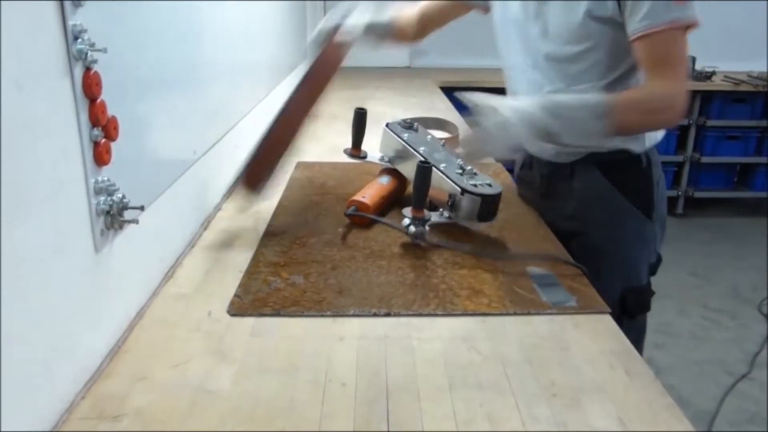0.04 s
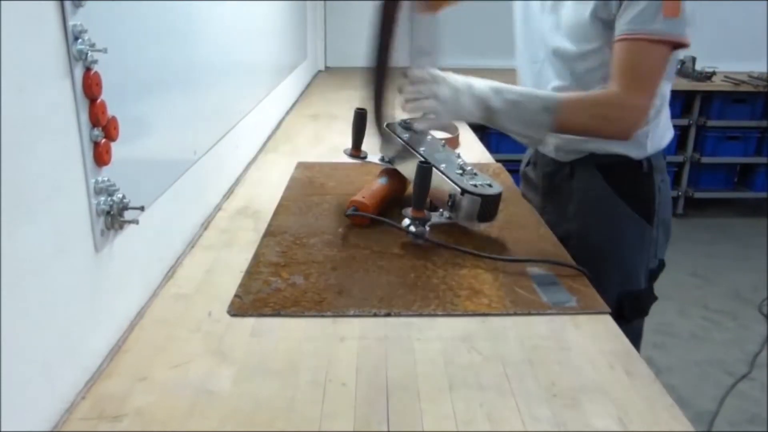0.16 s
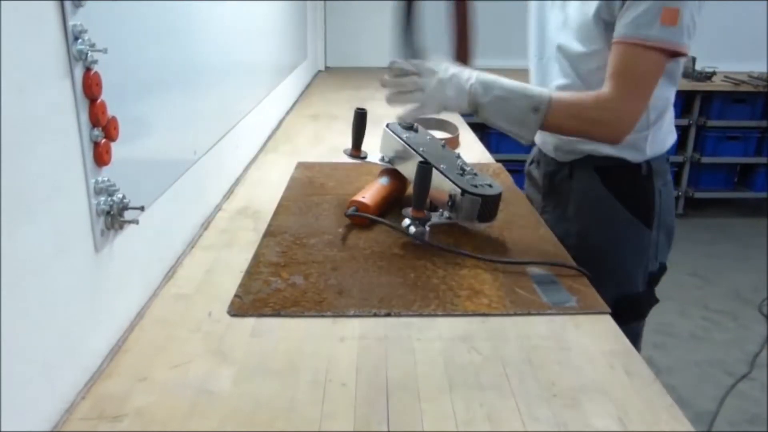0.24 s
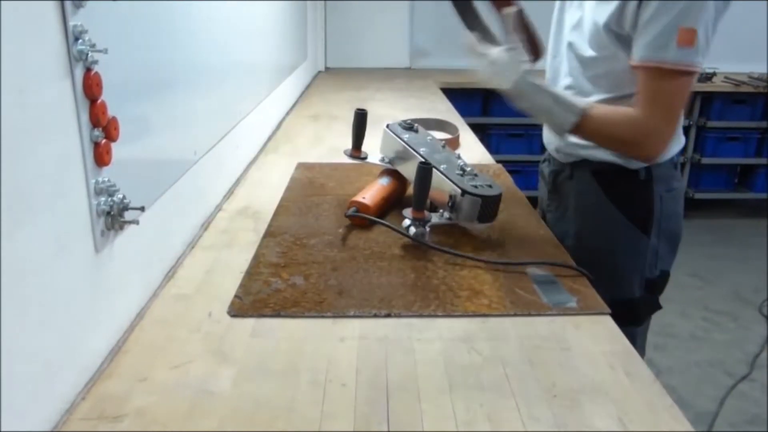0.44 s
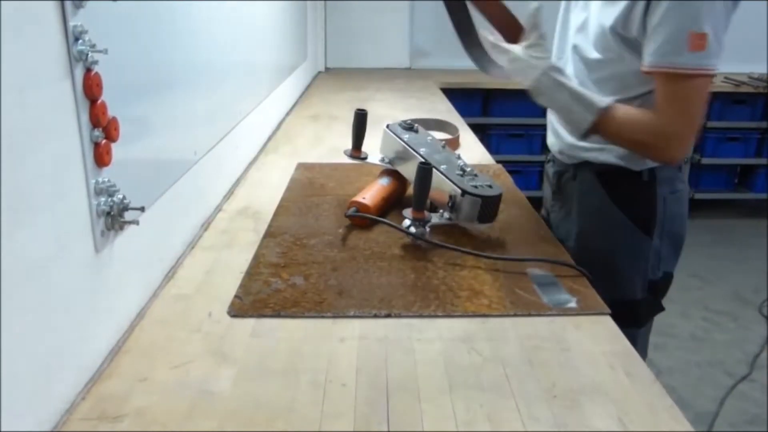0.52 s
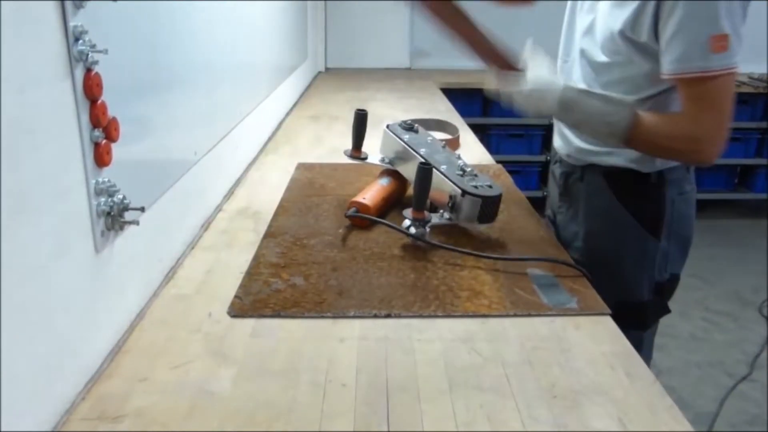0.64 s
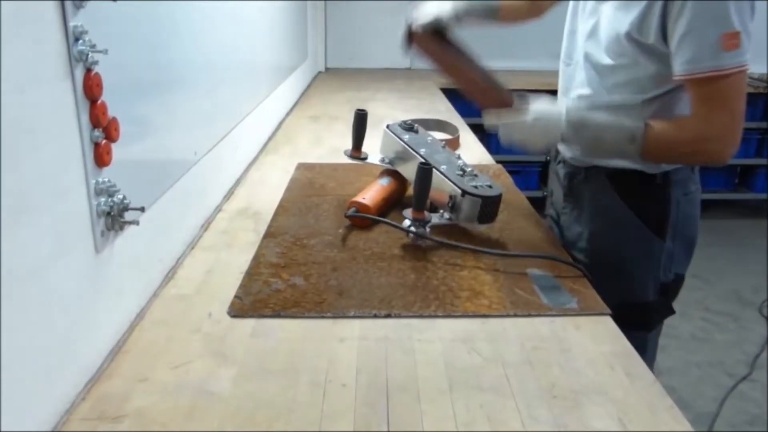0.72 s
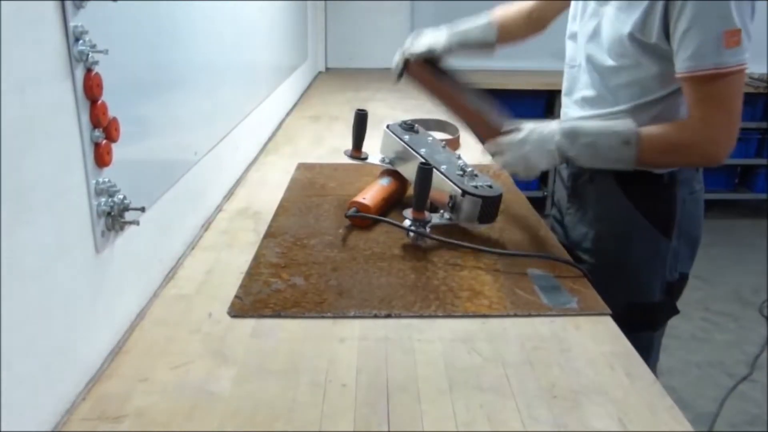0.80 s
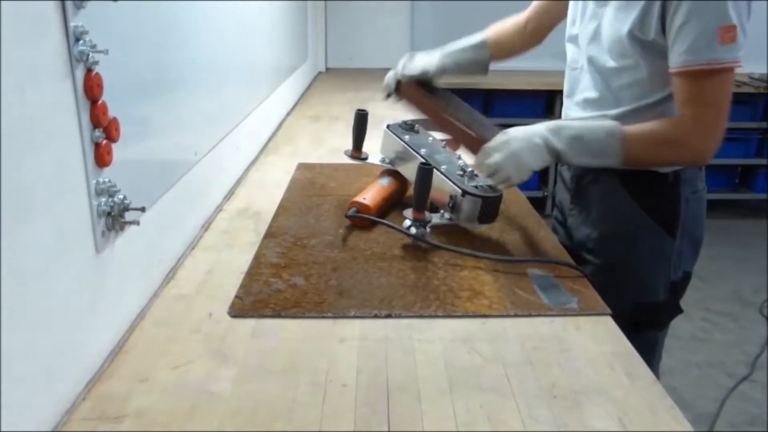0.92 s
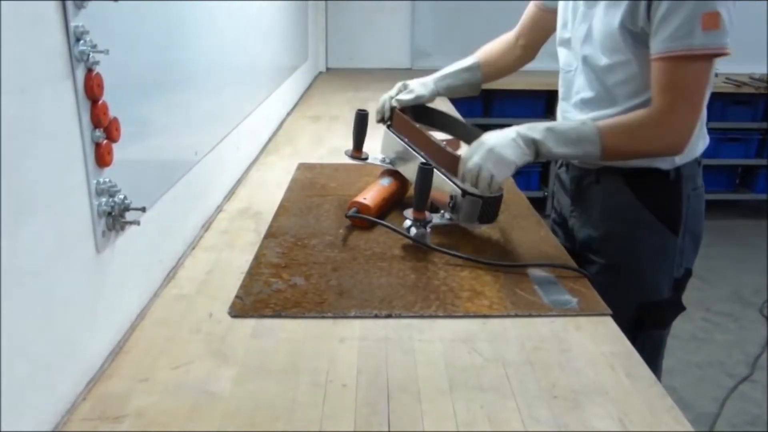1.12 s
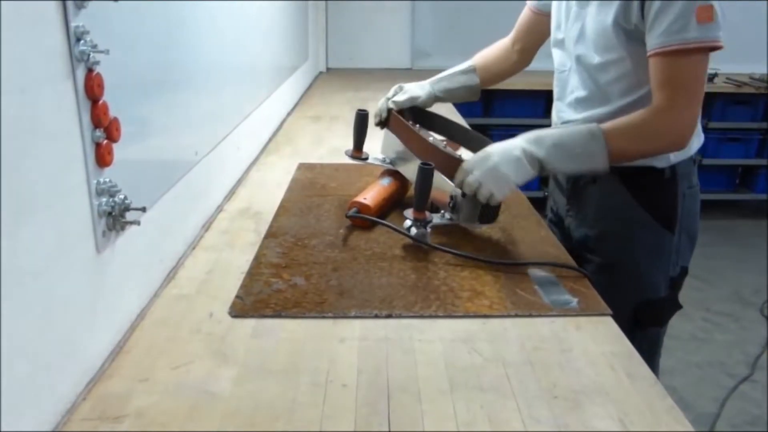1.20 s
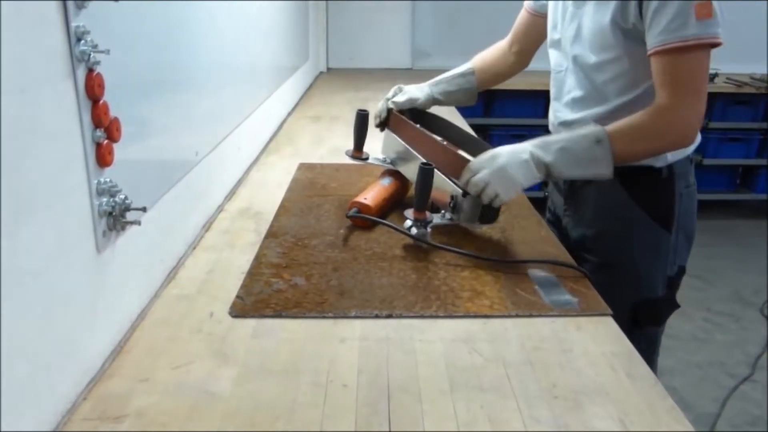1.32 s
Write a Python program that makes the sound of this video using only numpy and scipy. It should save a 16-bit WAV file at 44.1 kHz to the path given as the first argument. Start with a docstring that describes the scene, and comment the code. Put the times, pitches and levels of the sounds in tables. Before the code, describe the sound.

In a quiet workshop, a nearby belt sander gives one bright metallic clack and rocks briefly on the bench. Faint grainy rustles of gloves on a sanding belt follow, then a quick cluster of dull knocks and scrapes.

```python
"""A workshop, where a sanding belt is being fitted to a steel belt sander on a wooden bench.
The belt swishes through the air, then the tension arm snaps back: steel hits steel with a ringing clack,
the bench booms and the machine rocks on its feet. Gloves rustle on the belt in grainy strokes of friction,
and the stiff loop knocks down onto the rollers. A short room tail and still air lie behind it all."""
import sys
import numpy as np
from scipy import signal
from scipy.fft import rfft, irfft
from scipy.io import wavfile

SR = 44100
rng = np.random.default_rng(int(sys.argv[2]) if len(sys.argv) > 2 else 0)


def generate_wav(sig):
    """Save sig (samples, or channels by samples) to the path in sys.argv[1] as 16-bit PCM at SR."""
    pcm = np.round(np.clip(np.atleast_2d(sig).T, -1, 1) * 32767).astype(np.int16)
    wavfile.write(sys.argv[1], SR, pcm)


N = 59535
T = np.arange(N) / SR
FREQS = np.maximum(np.fft.rfftfreq(2 * N, 1 / SR), 1)

# the arm hits its stop and rebounds: t/s, level/dB
ARM_HITS = [(0.231, 1), (0.2326, -1.5)]
CLACK_S = ARM_HITS[0][0]
# spectrum of the small parts clattering: f/Hz, level/dB
CLATTER_SPECTRUM = [(70, -50.5), (190, -11), (500, -5.5), (1800, -1), (2900, -2), (4300, -3), (5500, -0.5),
                    (8000, -7), (15000, -24)]
# spectrum of the belt's gritty face: f/Hz, level/dB
GRIT_SPECTRUM = [(100, -35), (600, -15), (1200, -6), (1650, -5.5), (2600, -4.5), (5000, -9), (8000, -12.5),
                 (13000, -21.5), (16000, -36)]


def arm_clack():
    """Steel hits steel. Returns the crack with its clatter of small parts, and the ring of stop and frame."""
    # damped resonances of the stop: f/Hz, level/dB, t60/s
    stop_modes = [(530, -15.5, 0.02), (1760, -7.5, 0.029), (3470, -21, 0.033), (5217, 2.5, 0.016),
                  (5880, -8, 0.023), (6266, -11, 0.022), (7520, -7.5, 0.014), (9890, -12.5, 0.028)]
    # long ring of the steel frame, whose lowest two modes beat: f/Hz, level/dB, t60/s
    frame_modes = [(1246, -21, 0.37), (1261, -20.5, 0.38), (1665, -31, 0.35), (3490, -31, 0.52),
                   (3551, -32, 0.35), (3995, -25.5, 0.36), (4080, -22, 0.25), (4486, -33, 0.38),
                   (4662, -34, 0.38), (5270, -34, 0.42), (5880, -37, 0.42), (10630, -34, 0.2)]
    force = sum(from_db(db) * click(s) for s, db in ARM_HITS)
    crack = sum(from_db(db - 4.5) * decay(s, t60=0.02) for s, db in ARM_HITS)
    clatter = from_db(-15.5) * decay(CLACK_S, t60=0.079)
    steel = body(force, stop_modes) + body(click(CLACK_S), frame_modes)
    return noise(CLATTER_SPECTRUM, np.hypot(crack, clatter)), steel


def bench_boom():
    """After the blow the bench swells into a low, beating boom and the machine rocks on it."""
    # low modes of the bench: f/Hz, level/dB, t60/s
    bench_modes = [(108.4, -15.5, 0.44), (118.8, -27, 0.73)]
    # the machine rocks on its feet: t/s, level/dB, rattle t60/s
    rocks = [(0.266, -7, 0.091), (0.29, -12.5, 0.037), (0.316, -7, 0.055), (0.372, -14.5, 0.3)]
    # low resonances of the machine on the bench: f/Hz, level/dB, t60/s
    rattle_modes = [(230.4, -36.5, 0.52), (296, -24.5, 0.19), (436, -26.5, 0.21), (533.6, -32, 0.24)]
    start_s, rise_s = 0.26, 0.082
    swell = 1 - np.exp(-np.maximum(T - start_s, 0) / rise_s)
    rocking = sum(from_db(db) * (click(s) + chatter(s, t60)) for s, db, t60 in rocks)
    return swell * body(click(CLACK_S), bench_modes) + body(rocking, rattle_modes)


def belt_knocks():
    """Each touch taps and scuffs the loop into resonance, with a rough flap and a scrape of grit."""
    # the belt lands on the rollers: t/s, level/dB, scuff t60/s, bass/dB, scrape/dB, contact low-pass/Hz
    knocks = [(1.0583, -2.5, 0.1, -7, -10.5, 4960), (1.0646, -9, 0.38, 2.5, -9, 4000),
              (1.125, -3, 0.04, -6, -11, 1700), (1.1632, -3.5, 0.089, 1.5, -2, 6000),
              (1.1679, -1.5, 0.059, 1, 0, 7000), (1.182, -6, 0.12, 4, -3, 2970),
              (1.201, -13, 0.16, 11, -5, 2000), (1.239, -17, 0.047, -0.5, -11, 2500)]
    # resonances of the loop on the machine: f/Hz, level/dB, t60/s
    belt_modes = [(111.7, -57, 1), (215, -40, 0.061), (285.3, -31.5, 0.25), (463.4, -27.5, 0.062),
                  (566.5, -30.5, 0.089), (802, -33, 0.062), (1110, -27, 0.021), (1341, -27, 0.049),
                  (1600, -26.5, 0.051), (1689, -22.5, 0.036), (2320, -29.5, 0.02)]
    # spectrum of the cloth backing as it flaps: f/Hz, level/dB
    flap_spectrum = [(150, -27), (300, -15), (500, 6.5), (950, -5), (1450, 2), (2100, -7), (3200, -12),
                     (9000, -45)]
    bass_below_hz, flap_trim_db, scrape_trim_db = 620, -25.5, -30
    low_force, high_force, flap, scrape = 0, 0, 0, 0
    for s, db, t60, bass_db, scrape_db, contact_hz in knocks:
        force = from_db(db) * (click(s) + chatter(s, t60))
        force = signal.lfilter(*signal.butter(2, contact_hz, fs=SR), force)  # soft contacts are duller
        high_force = high_force + force
        low_force = low_force + from_db(bass_db) * force
        flap = np.hypot(flap, from_db(db + flap_trim_db) * decay(s, t60))
        scrape = np.hypot(scrape, from_db(db + scrape_db + scrape_trim_db) * decay(s, t60))
    low = body(low_force, [mode for mode in belt_modes if mode[0] < bass_below_hz])
    high = body(high_force, [mode for mode in belt_modes if mode[0] >= bass_below_hz])
    return low + high + noise(flap_spectrum, flap) + noise(GRIT_SPECTRUM, scrape)


def rustles():
    """Belt and gloves rub: grainy strokes swell and fade, each with its share of cloth and loop hum."""
    # strokes: peak t/s, level/dB, rise/s, t60/s, cloth share/dB, hum share/dB
    strokes = [(.004, -36.5, 0.035, 0.49, -5.5, -11.5), (0.11, -41.5, 0.0066, 0.35, -29, -15),
               (.177, -47, 0.0014, 0.021, 0, 6.5), (0.539, -47.5, 0.0043, 0.17, 3, -2.5),
               (.585, -53, 0.017, 0.15, -18, 4), (0.65, -46.5, 0.015, 0.65, -30, -26),
               (0.713, -41.5, 0.032, 0.18, -12, -2), (0.754, -41, 0.0009, 0.059, -2.5, -1),
               (0.768, -39.5, 0.0037, 0.11, -12.5, 1.5), (.818, -42, 0.004, 0.1, -6.5, 1.5),
               (.855, -42.5, 0.042, 0.21, -12, -1), (0.935, -40, 0.0014, 0.24, -16, -8.5),
               (1.265, -48.5, 0.11, 0.55, 4, -7), (1.326, -55.5, 0.03, 0.51, 4, 7.5)]
    # spectrum of dull cloth: f/Hz, level/dB
    cloth_spectrum = [(60, -15.5), (115, -2.5), (280, 0.5), (600, 2), (1200, -8.5), (3000, -14),
                      (12000, -43)]
    # the loop hums when rubbed: f/Hz, level/dB, t60/s
    hum_modes = [(1658, 2, 0.021), (2428, 0.5, 0.013)]
    grain_db, grain_s = 1.5, 0.0015
    grit, cloth, hum = 0, 0, 0
    for s, db, rise, t60, cloth_db, hum_db in strokes:
        swell = (T < s) * np.exp(-np.abs(T - s) / rise)
        stroke = from_db(db) * (swell + decay(s, t60))
        grit = np.hypot(grit, stroke)  # overlapping strokes add in power
        cloth = np.hypot(cloth, from_db(cloth_db) * stroke)
        hum = np.hypot(hum, from_db(hum_db) * stroke)
    grain_times = np.arange(0, N / SR, grain_s)
    flicker = np.interp(T, grain_times, rng.standard_normal(N)[:len(grain_times)])
    grain = unit_rms(from_db(grain_db * flicker))
    friction = noise(GRIT_SPECTRUM, grit * grain) + noise(cloth_spectrum, cloth)
    return friction + hum * unit_rms(body(diffuse(), hum_modes))


def radiated_blow():
    """Summed over all directions, the clack reaches the walls as one bright impulse of unit energy."""
    blow = colour(click(CLACK_S), CLATTER_SPECTRUM)
    return blow / np.sqrt(np.sum(blow ** 2))


def workshop_reverb(send):
    """The walls return a diffuse tail, longest in the bass and shortest in the top treble."""
    # tone of the tail: f/Hz, level/dB
    room_colour = [(60, -1), (250, 1), (700, 0.5), (1500, -3.5), (4000, -7.5), (8000, -8.5), (15000, -0.5)]
    # length of the tail: f/Hz, t60/s
    room_t60 = [(100, 1), (500, 0.44), (2000, 0.53), (5000, 0.62), (8000, 0.45), (14000, 0.16)]
    predelay_s = 0.0058
    white, tail = rfft(diffuse(), 2 * N), 0
    centres = np.geomspace(60, 16000, 9)
    for hz, pick in zip(centres, np.eye(len(centres))):
        band_gain = np.interp(np.log(FREQS), np.log(centres), pick)
        band = irfft(white * band_gain)[:, :N]
        tail = tail + band * decay(predelay_s, at_hz(room_t60, hz))
    tail = colour(tail / np.sqrt(np.sum(tail ** 2) / 2), room_colour)
    return signal.fftconvolve(send.mean(axis=0)[None], tail, axes=1)[:, :N]


def still_air():
    """A faint, steady bed of room tone."""
    # spectrum of the workshop's air: f/Hz, level/dB
    air_spectrum = [(25, 11), (60, -7), (120, 0.5), (800, -3), (4000, -5.5), (11000, -12.5), (16000, -47)]
    return from_db(-55) * noise(air_spectrum)


def from_db(db):
    """Decibels to gain."""
    return 10 ** (np.asarray(db) / 20)


def unit_rms(x):
    """Scale to unit rms."""
    return x / np.sqrt(np.mean(x ** 2) + 1e-20)


def at_hz(points, hz):
    """Read a table on a log-frequency axis."""
    f, value = np.transpose(points)
    return np.interp(np.log(hz), np.log(f), value)


def colour(x, points):
    """Minimum-phase EQ through points of f/Hz, level/dB."""
    cepstrum = irfft(np.log(from_db(at_hz(points, FREQS))))
    cepstrum[1:N] *= 2
    cepstrum[N + 1:] = 0
    return irfft(rfft(x, 2 * N) * np.exp(rfft(cepstrum)))[..., :N]


def diffuse():
    """Near-white stereo noise, narrow in the bass and wider in the treble."""
    # stereo width: f/Hz, side level/dB
    width = [(100, -17), (400, -17.5), (1000, -7.5), (2200, -9.5), (5000, -9), (11000, -5)]
    mid, side = rng.standard_normal((2, N))
    return mid + colour(side, width) * np.array([[1], [-1]])


def noise(spectrum, level=1):
    """Stereo noise that follows an rms level and then passes through a spectrum."""
    white = diffuse()
    return colour(level * white, spectrum) / np.std(colour(white, spectrum))


def decay(start, t60):
    """An envelope with a hard attack that falls 60 dB in t60 seconds."""
    return (T >= start) * from_db(-60 * np.maximum(T - start, 0) / t60)


def click(start):
    """A unit impulse."""
    return 1.0 * (np.arange(N) == int(start * SR))


def chatter(start, t60):
    """A dying run of tiny random contacts, with the energy of a unit click."""
    fade = decay(start, t60)
    return fade * rng.standard_normal(N) / np.sqrt(np.sum(fade ** 2))


def ring(force, hz, t60):
    """One mode rings as a damped sine; little is radiated below half its pitch."""
    radius = np.exp(-np.log(1000) / (t60 * SR))
    angle = 2 * np.pi * hz / SR
    swing = signal.lfilter([0, np.sin(angle)], [1, -2 * radius * np.cos(angle), radius ** 2], force + 1e-18)
    return signal.lfilter(*signal.butter(2, hz / 2, "high", fs=SR), swing)


def body(force, modes):
    """A resonant body: parallel modes of alternating sign."""
    return sum((-1) ** k * from_db(db) * ring(force, hz, t60) for k, (hz, db, t60) in enumerate(modes))


def scene():
    """The handling sounds, each with its send to the room (the bench stays dry), over still air."""
    clack, steel = arm_clack()
    knocks, rubs = belt_knocks(), rustles()
    send = from_db(15) * radiated_blow() + from_db(-10) * steel
    send = send + from_db(-8.5) * knocks + from_db(-8) * rubs
    return clack + steel + bench_boom() + knocks + rubs + workshop_reverb(send) + still_air()


def record(dry):
    """Slightly unequal microphones with a treble notch; the clack overloads; bass and top are cut."""
    # microphone balance: f/Hz, left minus right/dB
    balance = [(900, -0.21), (2000, 0.78)]
    notch_hz, clip_level, low_cut_hz, high_cut_hz = 9080, 0.73, 65, 16960
    left = colour(dry[0], [(hz, db / 2) for hz, db in balance])
    right = colour(dry[1], [(hz, -db / 2) for hz, db in balance])
    x = signal.lfilter(*signal.iirnotch(notch_hz, Q=18, fs=SR), np.array([left, right]))
    x = clip_level * np.tanh(x / clip_level)
    x = signal.sosfilt(signal.butter(2, low_cut_hz, "high", fs=SR, output="sos"), x)
    return signal.sosfilt(signal.cheby2(12, 70, high_cut_hz, fs=SR, output="sos"), x)


dry = scene()
out = record(dry)
generate_wav(out)
```